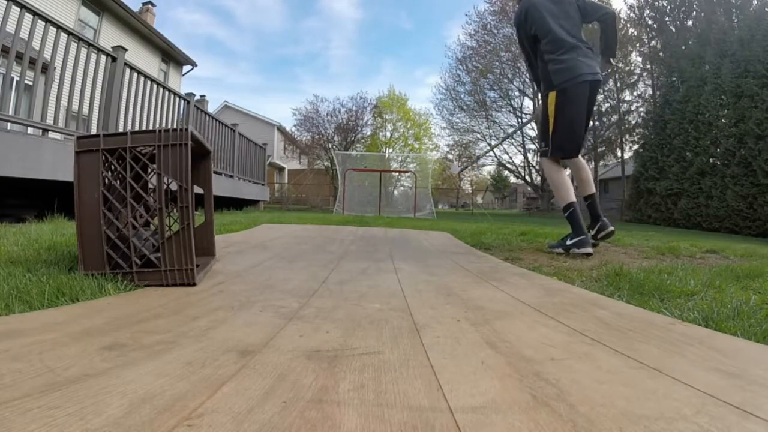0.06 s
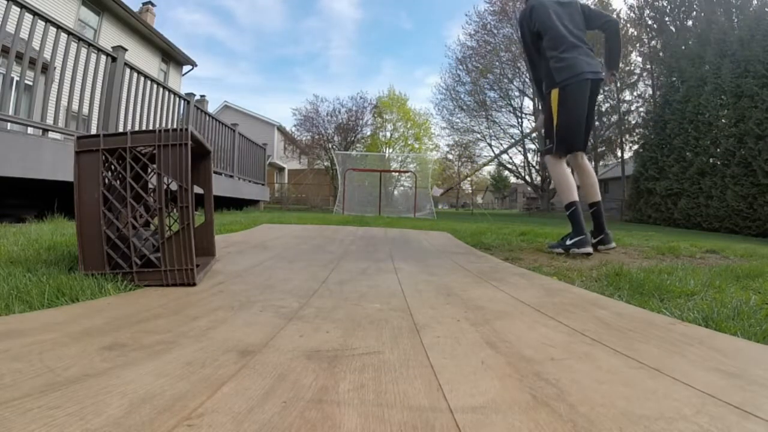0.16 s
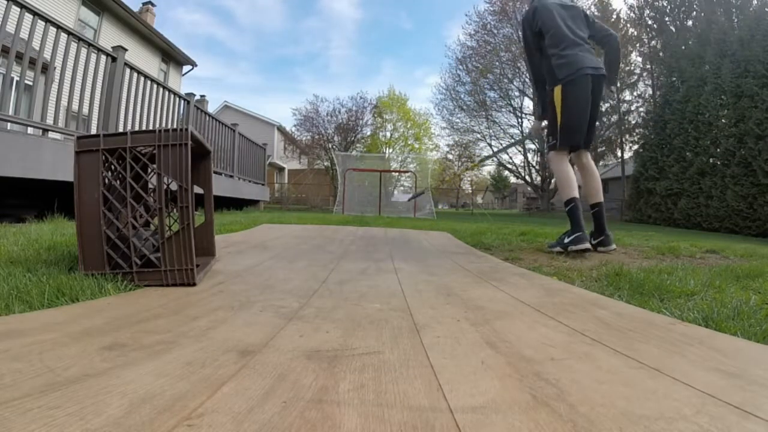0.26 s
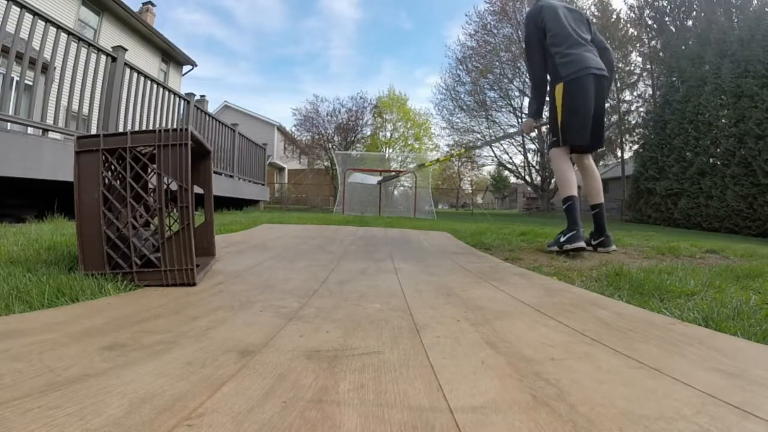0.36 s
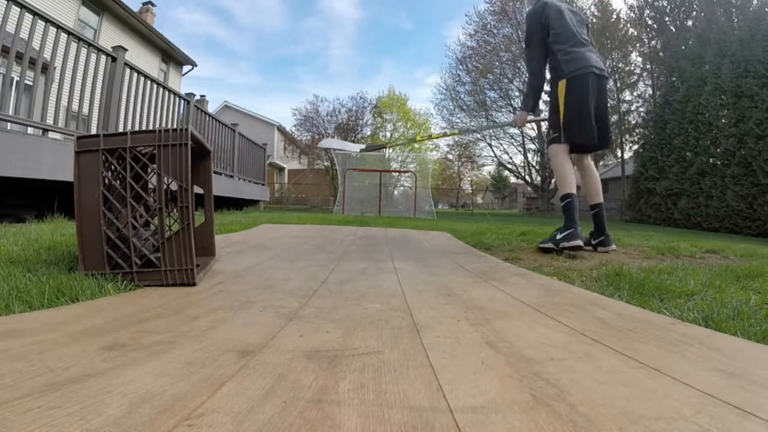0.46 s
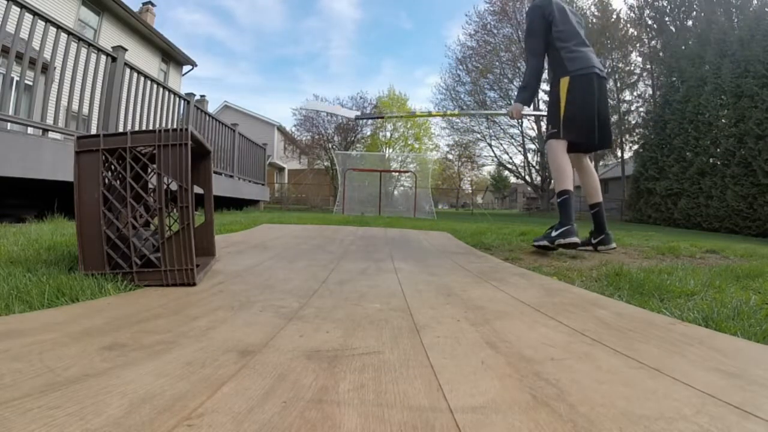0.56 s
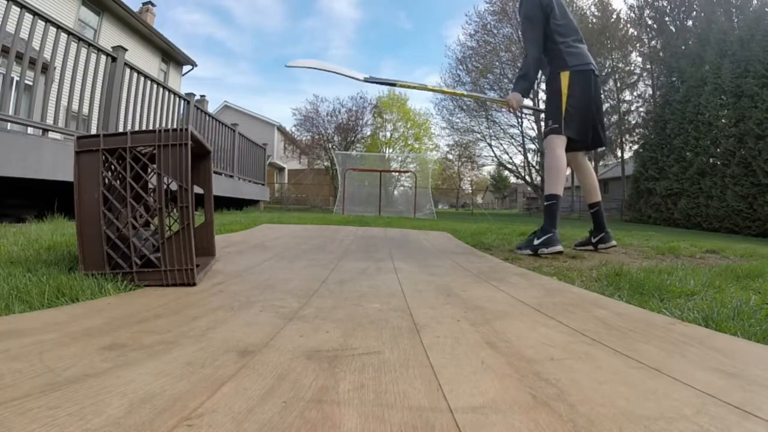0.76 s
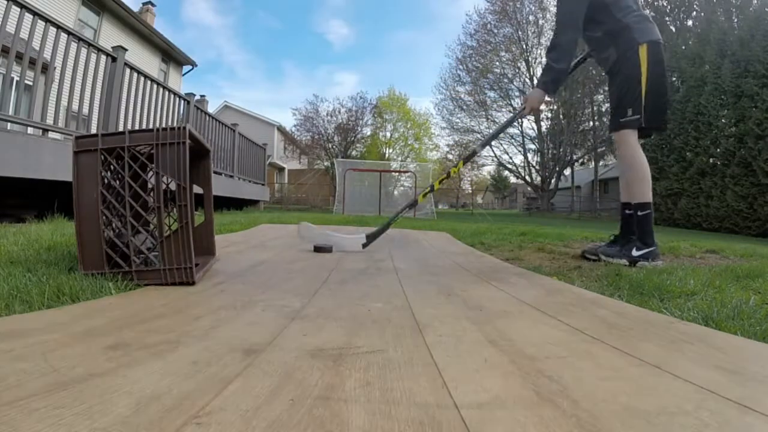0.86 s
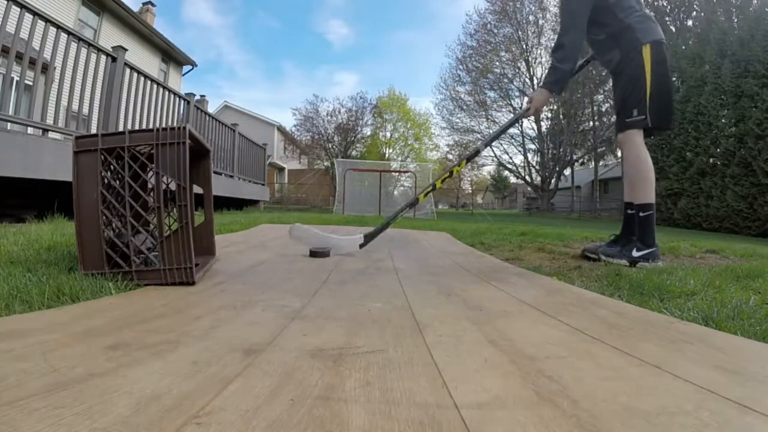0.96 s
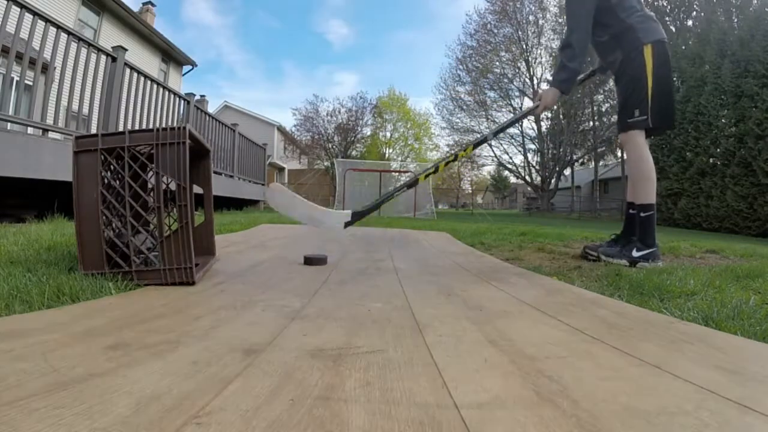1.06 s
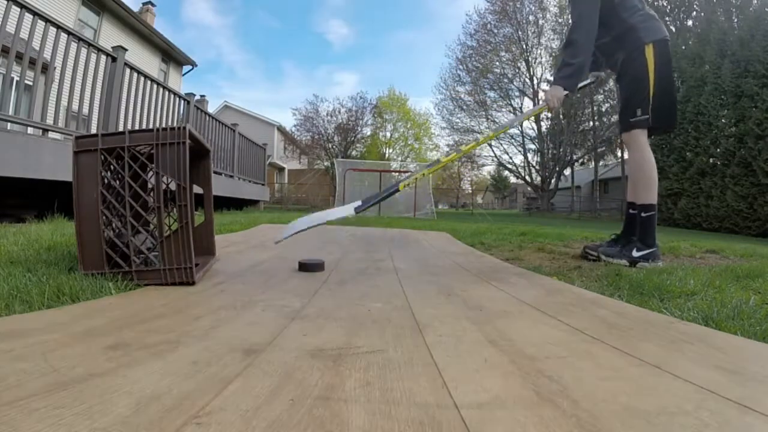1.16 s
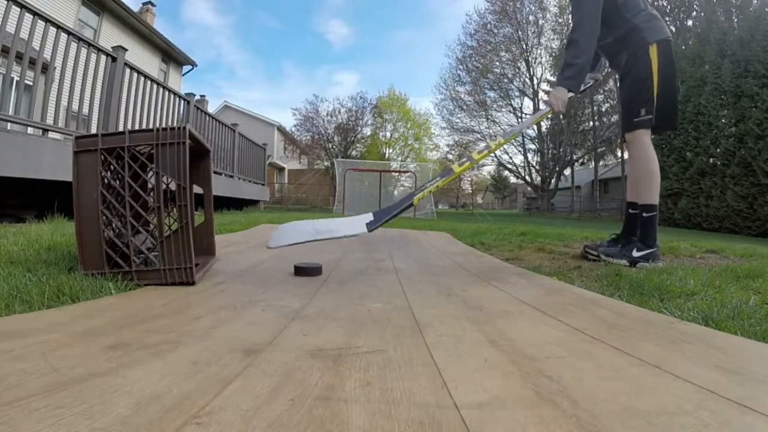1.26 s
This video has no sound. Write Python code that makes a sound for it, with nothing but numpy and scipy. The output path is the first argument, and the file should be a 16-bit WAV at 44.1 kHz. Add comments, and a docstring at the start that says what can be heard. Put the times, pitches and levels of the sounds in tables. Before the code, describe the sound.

Hockey puck hitting a ringing goal post, followed by a close stick knock and wooden scrape.

```python
"""A back yard: a hockey puck cracks against a steel goal post; the pipe rings, house wall and yard answer.
Close by, the stick blade slaps a wooden shooting board and drags the next puck over it with a rising hiss.
Faint birds sing over a low outdoor rumble."""
import sys
import numpy as np
from scipy import signal
from scipy.fft import rfft, irfft, next_fast_len
from scipy.io import wavfile
from scipy.ndimage import map_coordinates

SR = 44100
rng = np.random.default_rng(int(sys.argv[2]) if len(sys.argv) > 2 else 0)


def inscribe(sig):
    """Save sig as 16-bit PCM at rate SR to the path in sys.argv[1].

    A 1-D sig is mono; a 2-D sig holds one channel per row.
    Samples are clipped to [-1, 1] before scaling.
    """
    pcm = np.round(np.clip(np.atleast_2d(sig).T, -1, 1) * 32767)
    wavfile.write(sys.argv[1], SR, pcm.astype(np.int16))


N = 57330
T = np.arange(N) / SR


def amp(db):
    """Decibels to gain."""
    return 10 ** (np.asarray(db) / 20)


def unit(x):
    """Scale to rms 1."""
    return x / np.sqrt(np.mean(x ** 2) + 1e-20)


def along(points, hz):
    """Interpolate (frequency [Hz], value) points on a log axis."""
    knots_hz, values = np.transpose(points)
    return np.interp(np.log(hz + 1), np.log(knots_hz + 1), values)


def fade(t, t60_s):
    """Exponential decay; 1 before t = 0."""
    return np.exp(-np.log(1000) * np.maximum(t, 0) / t60_s)


def wobble(knots_per_s):
    """Smooth random curve."""
    return map_coordinates(rng.standard_normal(N), [T * knots_per_s], mode="mirror")


def filtered(x, response):
    """Zero-phase filter with gain response(hz)."""
    size = next_fast_len(N + SR // 2)
    return irfft(rfft(x, size) * response(np.fft.rfftfreq(size, 1 / SR)), size)[:N]


def noise(spectrum):
    """Coloured noise, rms 1."""
    return unit(filtered(rng.standard_normal(N), lambda hz: amp(along(spectrum, hz))))


def delayed(x, delay_s):
    """Delay, cut to N samples."""
    return np.pad(x, (max(round(delay_s * SR), 0), 0))[:N]


def tail(spectrum, decay):
    """Noise tail, energy 1, with a t60 per frequency."""
    hz, t, bins = signal.stft(noise(spectrum), SR, nperseg=256)
    y = signal.istft(bins * fade(t, along(decay, hz)[:, None]), SR)[1][:N]
    return y / np.linalg.norm(y)


def pulse(spectrum, tilt_db_per_oct, size=4096):
    """Minimum-phase pulse, energy 1, tilted above about 500 Hz."""
    hz = np.fft.rfftfreq(size, 1 / SR)
    level_db = along(spectrum, hz) + tilt_db_per_oct * np.log2(1 + hz / 500)
    cepstrum = irfft(np.log(amp(level_db)))
    cepstrum[1:size // 2] *= 2
    cepstrum[size // 2 + 1:] = 0
    y = irfft(np.exp(rfft(cepstrum)))
    return np.pad(y / np.linalg.norm(y), (0, N - size))


def rumble():
    """Steady low outdoor noise."""
    # background spectrum (frequency [Hz], relative density [dB])
    spectrum = [(20, -12), (50, -3), (80, -2), (125, 1.5), (180, -9.5), (280, -16.5), (500, -24),
                (1000, -29), (2000, -34.5), (3500, -37), (6000, -43.5), (10000, -52), (15000, -59)]
    return amp(-44.5) * noise(spectrum)


def birds():
    """Gliding, swinging whistles, scattered by leaves."""
    # notes (start [s], length [s], level [dB], centre [Hz], glide [Hz/s], swing [Hz], swing rate [Hz])
    notes = [(0, 0.0386, -55.5, 4670, 15003, 600, 20), (0.03, 0.041, -52.5, 4310, 25005, -450, 29),
             (.083, 0.039, -52.5, 3675, 6006, 107, 26), (0.492, 0.069, -53.5, 3660, -9000, 223, 40),
             (0.54, 0.058, -54, 3148, -6000, 219, 35.3), (0.8, .052, -61.5, 2990, -3000, 129, 20),
             (1.079, .062, -41, 3244, 3, -330, 14), (1.208, 0.042, -42.5, 2714, -18000, 75, 20)]
    flutter_hz, scatter_db = 69.3, -5
    song = np.zeros(N)
    for start_s, length_s, db, centre_hz, glide_hz_per_s, swing_hz, rate_hz in notes:
        t = T - start_s
        hz = centre_hz + glide_hz_per_s * np.clip(t - length_s / 2, -length_s, length_s)
        hz = hz - swing_hz * np.cos(2 * np.pi * rate_hz * t) + flutter_hz * wobble(300)
        envelope = np.sqrt(np.abs(np.sin(np.pi * np.clip(t / length_s, 0, 1))))
        song += amp(db + 2.7 * wobble(140)) * envelope * np.sin(2 * np.pi * np.cumsum(hz) / SR)
    leaves = rng.standard_normal(N) * fade(T, t60_s=0.18)
    return song + amp(scatter_db) * signal.fftconvolve(song, leaves / np.linalg.norm(leaves))[:N]


def knocks():
    """Knocks and scuffs on lawn, rattling goal frame and board: band-limited noise bursts."""
    # bursts (start [s], level [dB], centre [Hz], half-width [oct], rise [s], t60 [s])
    bursts = [(0.129, -27, 156, 1.1, 0.0013, 0.024), (0.1311, -44.5, 520, 0.51, 0.00059, 0.038),
              (.238, -27.5, 3720, 0.57, 0.0055, .06), (.239, -42, 9600, 0.1, 0.0018, 0.053),
              (.276, -32.5, 690, 2.33, 0.00067, 0.039), (0.2775, -33.5, 4750, 0.083, 0.00074, 0.045),
              (0.293, -44.5, 6870, 0.089, 0.0007, 0.08), (0.307, -43.5, 3120, 0.94, 0.0016, 0.16),
              (0.9462, -16, 3600, 0.45, 0.00025, 0.0035), (0.9455, -41.5, 8200, 0.099, 0.00017, 0.013),
              (1.064, -32, 500, 0.64, 0.0014, 0.037), (1.064, -35.5, 5960, 0.53, .002, 0.018),
              (1.158, -36, 2000, 0.061, 0.0017, 0.065), (1.21, -32.5, 1590, 0.25, .002, 0.037),
              (1.249, -32, 1270, 0.54, 0.0094, 0.056)]
    out = np.zeros(N)
    for start_s, db, centre_hz, width_oct, rise_s, t60_s in bursts:
        white = rng.standard_normal(N)
        band = filtered(white, lambda hz: 1 / (1 + (np.log2((hz + 1) / centre_hz) / width_oct) ** 4))
        envelope = (1 - np.exp(-T / rise_s)) * fade(T - rise_s, t60_s)
        out += delayed(amp(db) * unit(band) * envelope, start_s)
    return out


def slide():
    """Puck and blade rub over wood: grainy hiss and a lower scrape."""
    # friction envelopes (time [s], hiss level [dB], scrape level [dB])
    levels = [(0, -120, -120), (.85, -87, -94), (0.888, -62, -50), (.925, -83, -57), (.965, -53.5, -53),
              (.993, -61, -52), (1.005, -44, -54), (1.028, -55, -53.5), (1.078, -44.5, -43.5),
              (1.124, -41.5, -50), (1.175, -39.5, -43), (1.22, -46, -47.5), (1.3, -48, -42.5)]
    # friction spectra (frequency [Hz], relative density [dB])
    hiss_spectrum = [(800, -12), (2000, -7), (3200, 0.5), (5000, -3), (8000, -6), (10000, -11),
                     (12500, -24), (15000, -29)]
    scrape_spectrum = [(100, -34), (420, 4), (800, 1), (1100, -1), (1600, -3), (2400, -7), (5000, -18),
                       (15000, -30)]
    grains_per_s, grain_db = 486.8, 1.5
    time_s, hiss_db, scrape_db = np.transpose(levels)
    hiss = unit(noise(hiss_spectrum) * amp(grain_db * wobble(grains_per_s)))
    scrape = unit(noise(scrape_spectrum) * amp(grain_db * wobble(grains_per_s / 2)))
    return amp(np.interp(T, time_s, hiss_db)) * hiss + amp(np.interp(T, time_s, scrape_db)) * scrape


def board_flex():
    """The board's lowest bending mode swells and decays."""
    mode_hz, level_db, start_s, rise_s = 52, -41, 0.796, 0.26
    swell = np.clip((T - start_s) / rise_s, 0, 1) * fade(T - start_s - rise_s, t60_s=1.16)
    return amp(level_db) * swell * unit(np.sin(2 * np.pi * mode_hz * T + 0.44 * wobble(14.8)))


def blade():
    """Heel and toe slap the board; each contact is one push and a short wooden ring."""
    # blade contacts (time [s], energy [dB], tilt [dB/oct])
    contacts = [(.9318, 10.5, -0.5), (0.9458, 1.5, -11), (0.9476, 4.5, -3.5), (0.9548, -18.5, -4)]
    # spectra of contact and board ring (frequency [Hz], relative density [dB])
    push_spectrum = [(40, -34.5), (130, -11), (270, 2), (500, -4), (1000, 1), (1600, -3), (2200, -12.5),
                     (2800, -24), (4500, -27.5), (6500, -54), (8500, -52), (12000, -66), (16000, -69)]
    board_spectrum = [(60, -29), (150, -21), (550, 4.5), (800, -6), (1500, -6.5), (2300, -13.5),
                      (4000, -10.5), (6500, -24), (14000, -49)]
    # board damping (frequency [Hz], t60 [s])
    board_decay = [(100, 0.36), (550, 0.13), (1500, 0.076), (5000, 0.018)]
    out = np.zeros(N)
    for time_s, db, tilt_db_per_oct in contacts:
        push = pulse(push_spectrum, tilt_db_per_oct)
        ring = amp(-9.5) * tail(board_spectrum, board_decay)
        out += delayed(amp(db) * (push + ring), time_s)
    return out


def yard(x):
    """Diffuse reflections off house and fence."""
    # reverb colour (frequency [Hz], relative density [dB])
    colour = [(300, -0.5), (1600, -8.5), (3000, -2), (7000, -0.5), (14000, 1)]
    # reverb decay (frequency [Hz], t60 [s])
    decay = [(300, 0.5), (1600, 0.96), (4500, 0.75), (7000, 0.57), (8200, 0.47), (14000, 0.42)]
    return signal.fftconvolve(x, tail(colour, decay))[:N]


def post():
    """Puck hits steel: a dense crack and beating pipe modes, plus wall echo and yard reverb."""
    # steel pipe modes (frequency [Hz], level [dB], t60 [s])
    modes = [(592, -28.5, 0.12), (1018, -29, 0.1), (1155, -30.5, 0.12), (1557, -24.5, .25),
             (1594, -27.5, .39), (1611, -9, .08), (1635, -16, .31), (1706, -16.5, .07), (1797, -30, .2),
             (1996, -29, 0.17), (2514, -39, 0.1), (3550, -36, 0.13), (4230, -59, 0.12), (4810, -32, 0.16),
             (5130, -31, .16)]
    # crack of puck and frame (frequency [Hz], relative density [dB])
    crack_spectrum = [(150, -20.5), (400, -0.5), (1100, 3), (2000, 3), (3600, 3), (5000, -2), (7500, -7.5),
                      (9300, -10), (11800, -26.5), (14500, -15), (16000, -33)]
    hit_s, attack_s, hold_s, waver_rad = 0.208, 0.004, 0.0081, 0.04
    ring = np.zeros(N)
    for hz, db, t60_s in modes:
        ring += amp(db) * fade(T, t60_s) * np.sin(2 * np.pi * hz * T + waver_rad * wobble(121))
    ring *= 1 - np.exp(-T / attack_s)
    crack = amp(-23.5) * noise(crack_spectrum) * fade(T - hold_s, t60_s=0.059)
    wall_echo = amp(-19.5) * delayed(crack, delay_s=0.088)
    reverb = yard(amp(-18) * ring + amp(-9.5) * crack)
    return delayed(ring + crack + wall_echo + reverb, hit_s)


def scene():
    """Mono sum of all sources."""
    return (post() + knocks() + blade() + slide() + board_flex() + birds() + rumble())[None]


def record(dry):
    """Steep low-pass band limit."""
    cutoff_hz = 15350
    return filtered(dry[0], lambda hz: 1 / np.sqrt(1 + (hz / cutoff_hz) ** 160))[None]


dry = scene()
out = record(dry)
inscribe(out)
```